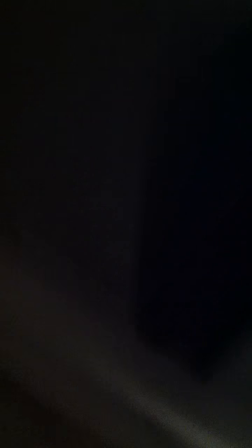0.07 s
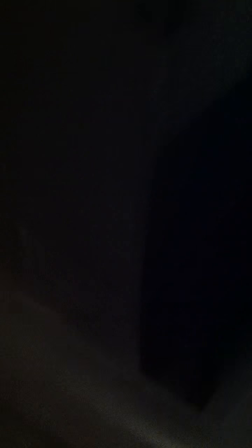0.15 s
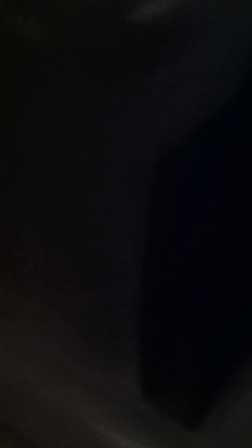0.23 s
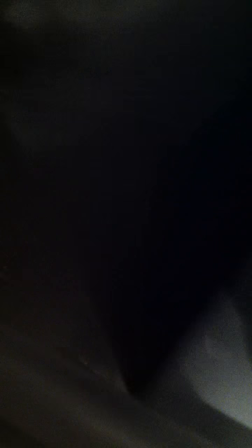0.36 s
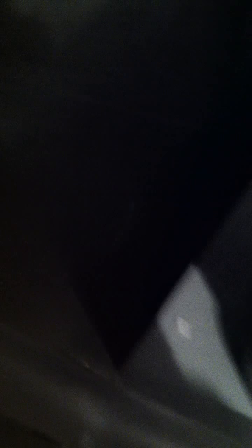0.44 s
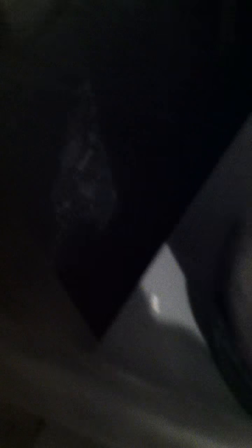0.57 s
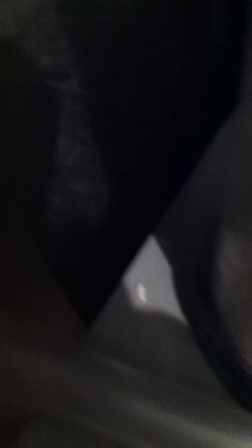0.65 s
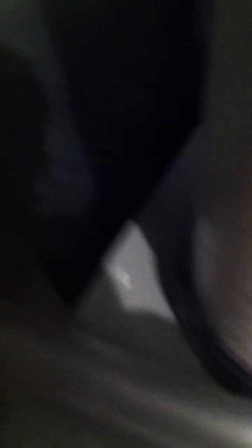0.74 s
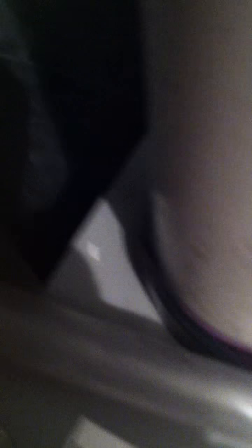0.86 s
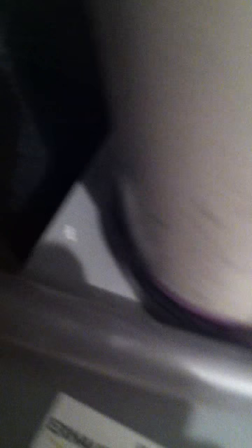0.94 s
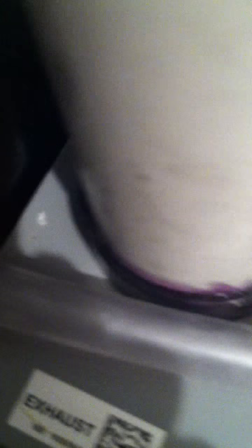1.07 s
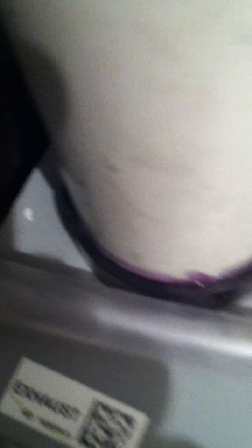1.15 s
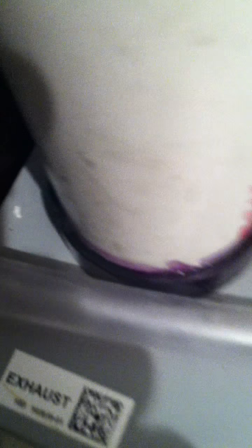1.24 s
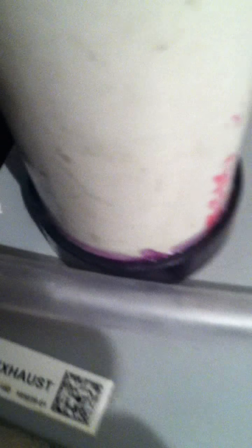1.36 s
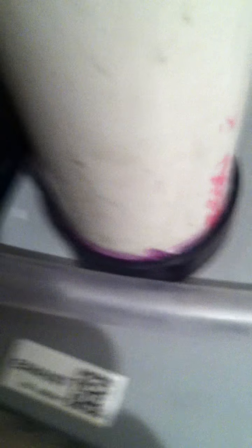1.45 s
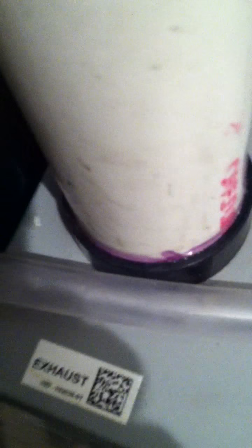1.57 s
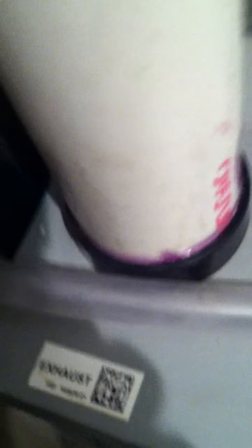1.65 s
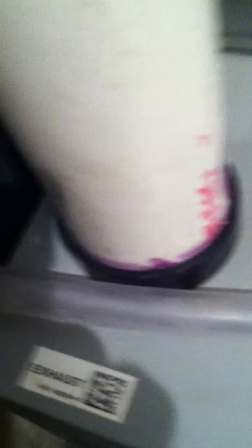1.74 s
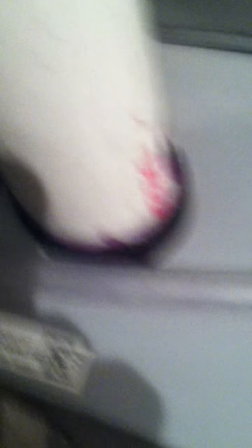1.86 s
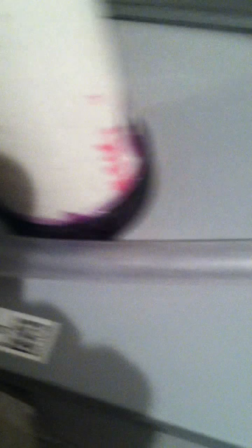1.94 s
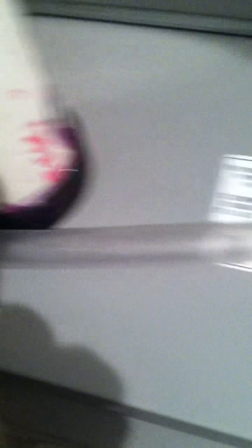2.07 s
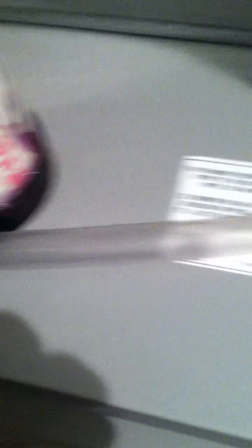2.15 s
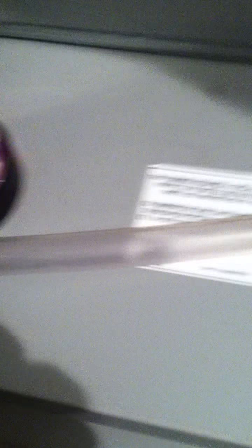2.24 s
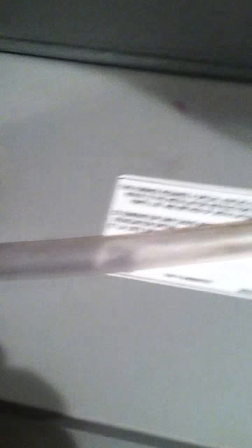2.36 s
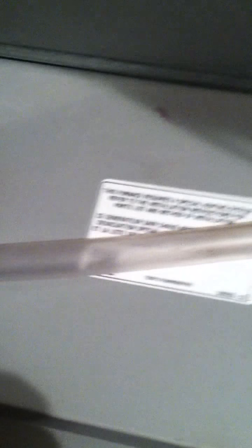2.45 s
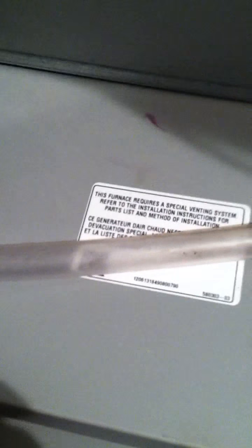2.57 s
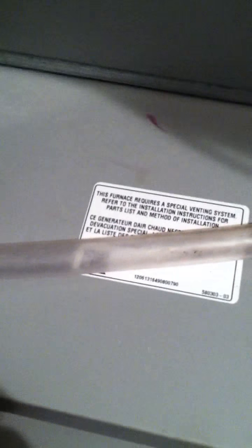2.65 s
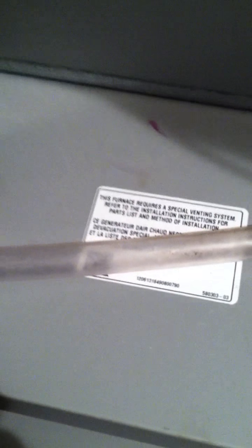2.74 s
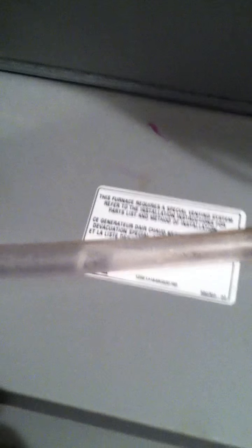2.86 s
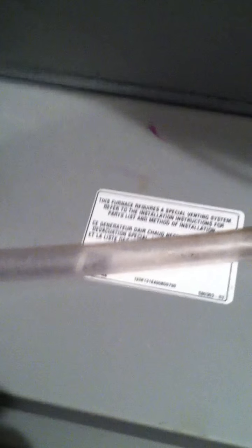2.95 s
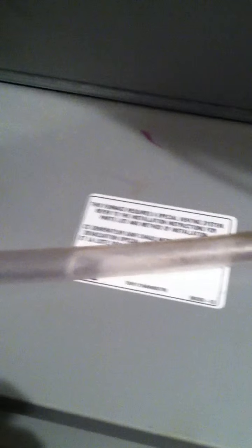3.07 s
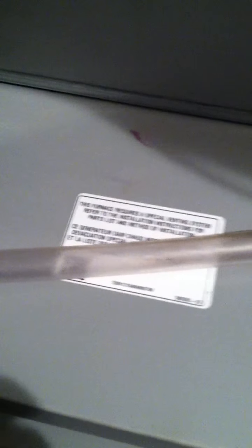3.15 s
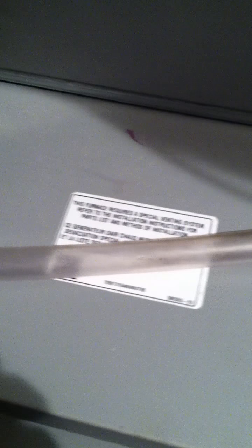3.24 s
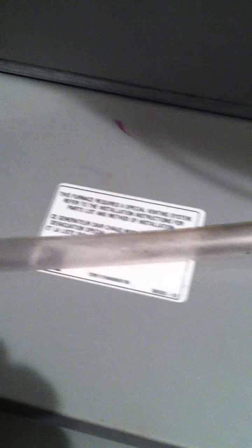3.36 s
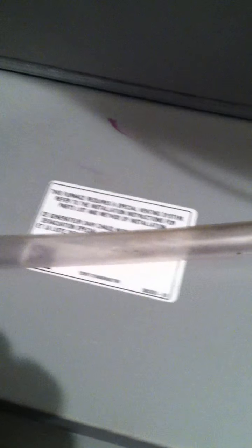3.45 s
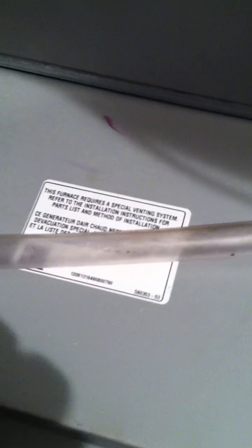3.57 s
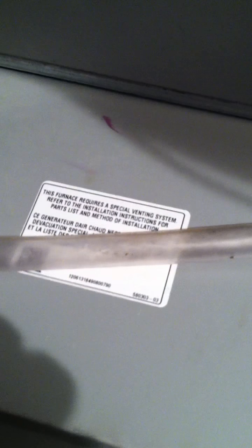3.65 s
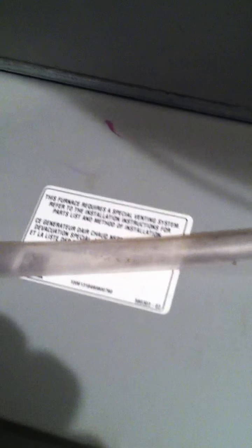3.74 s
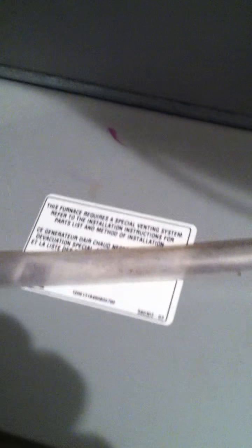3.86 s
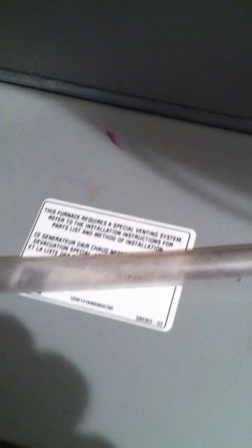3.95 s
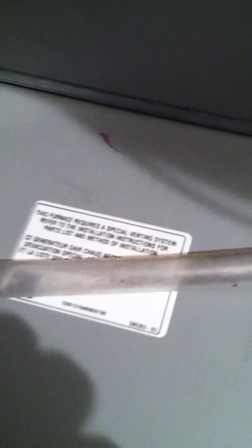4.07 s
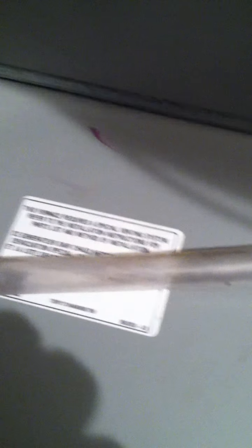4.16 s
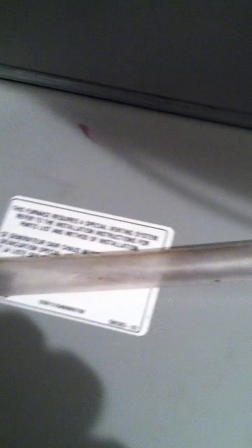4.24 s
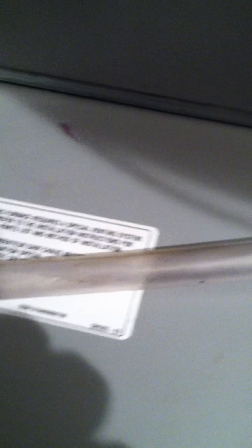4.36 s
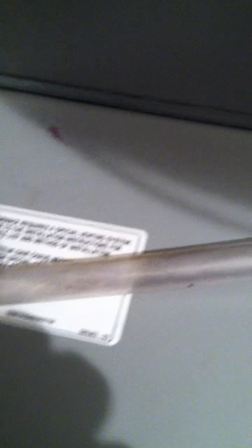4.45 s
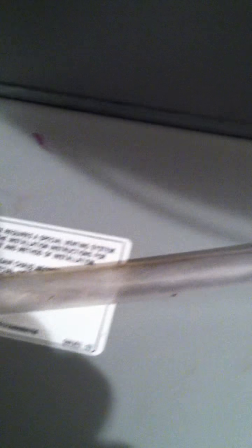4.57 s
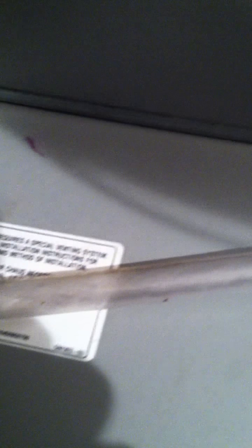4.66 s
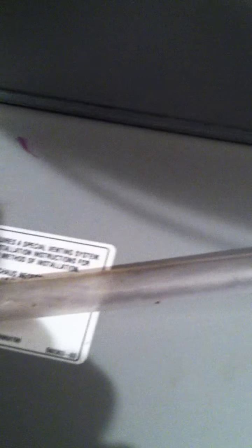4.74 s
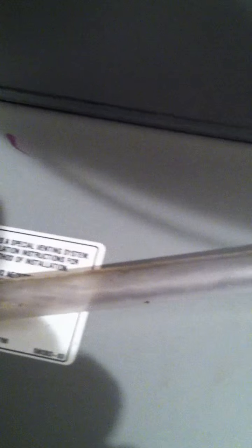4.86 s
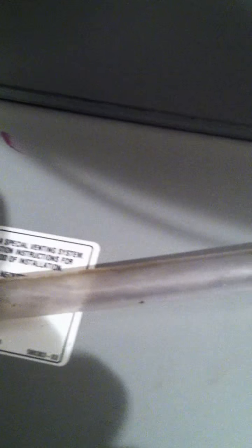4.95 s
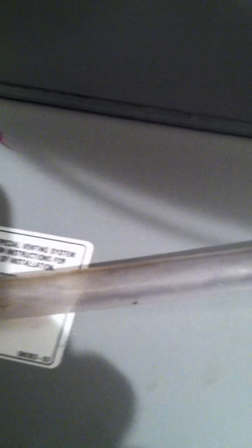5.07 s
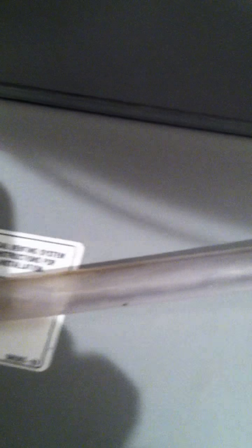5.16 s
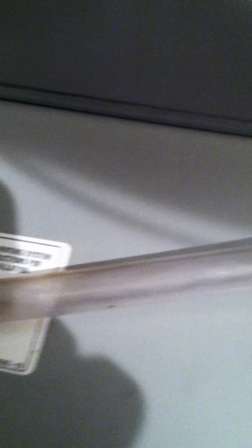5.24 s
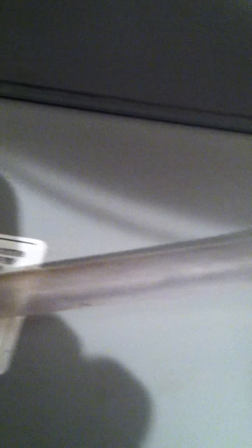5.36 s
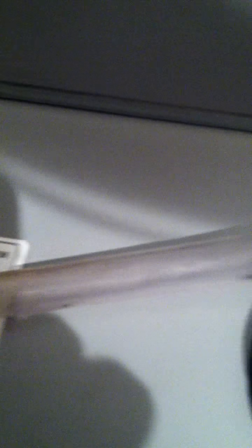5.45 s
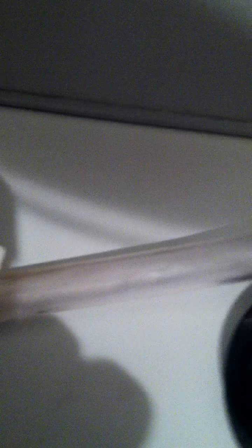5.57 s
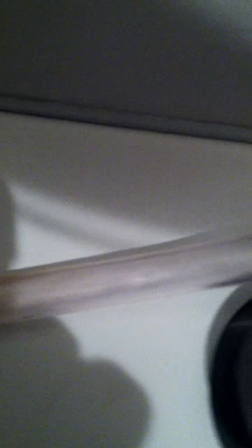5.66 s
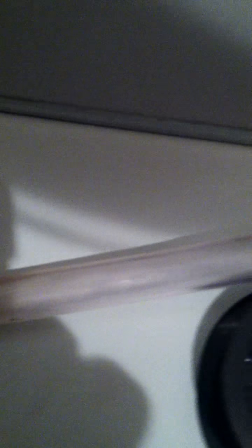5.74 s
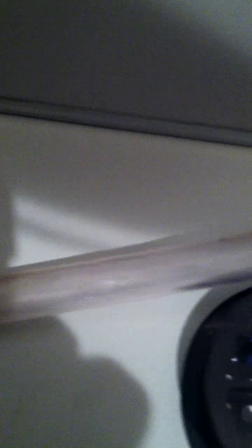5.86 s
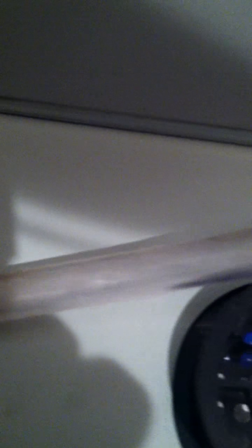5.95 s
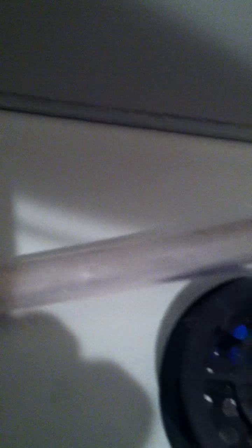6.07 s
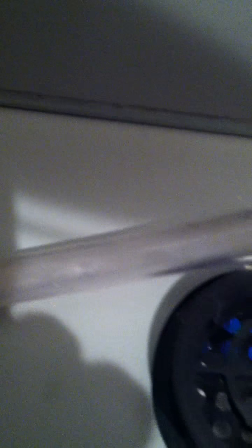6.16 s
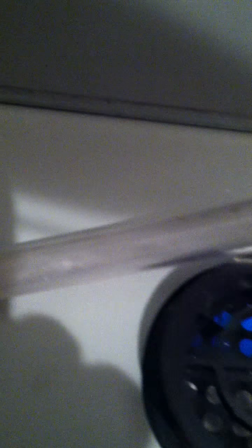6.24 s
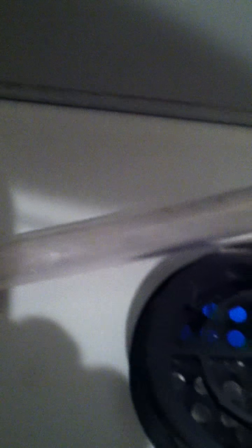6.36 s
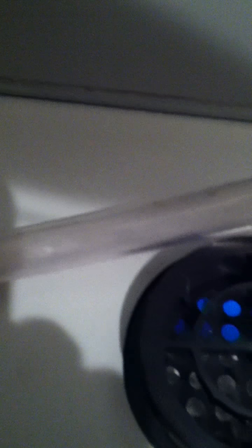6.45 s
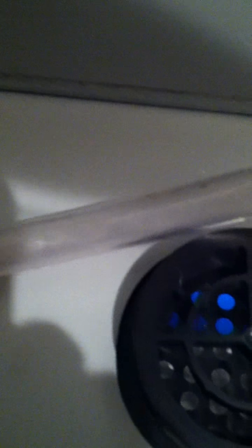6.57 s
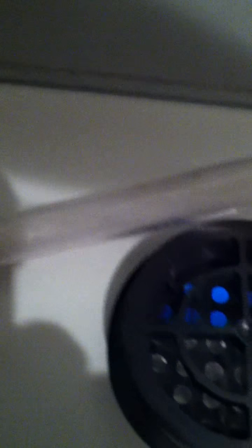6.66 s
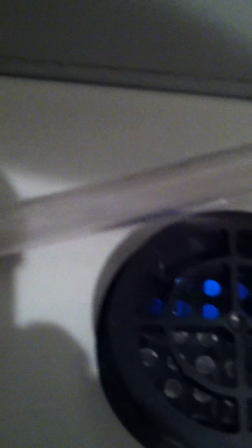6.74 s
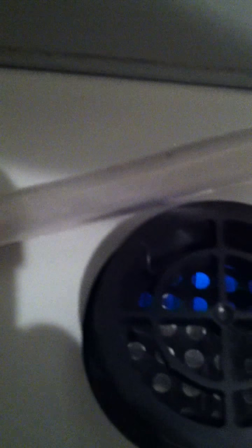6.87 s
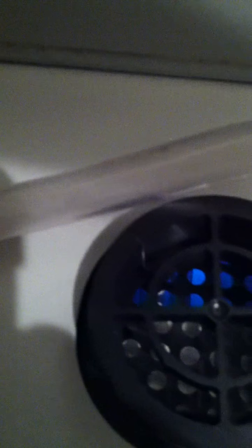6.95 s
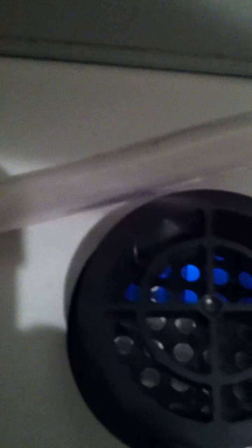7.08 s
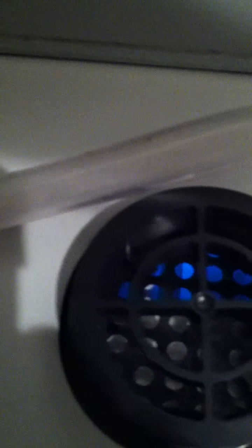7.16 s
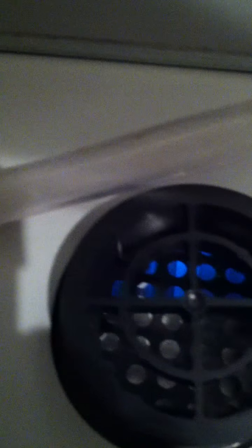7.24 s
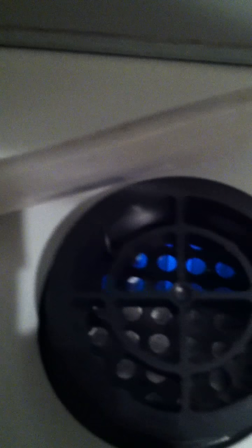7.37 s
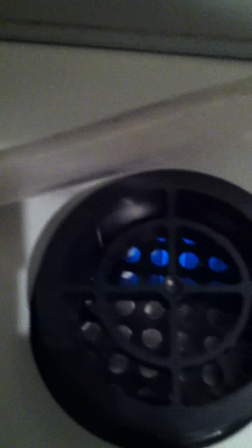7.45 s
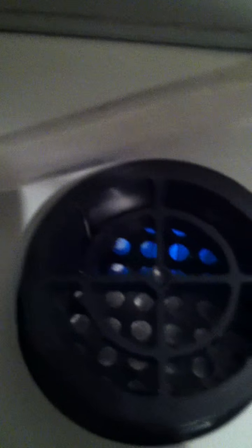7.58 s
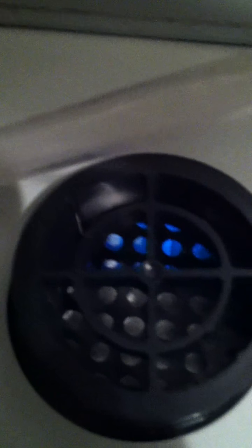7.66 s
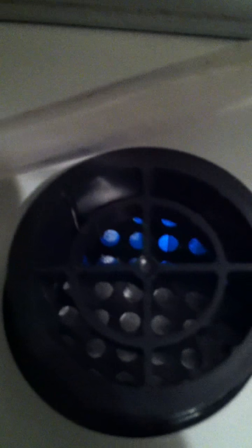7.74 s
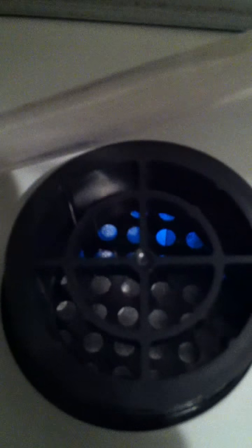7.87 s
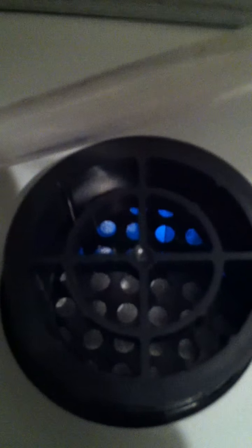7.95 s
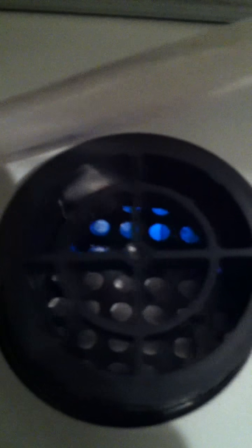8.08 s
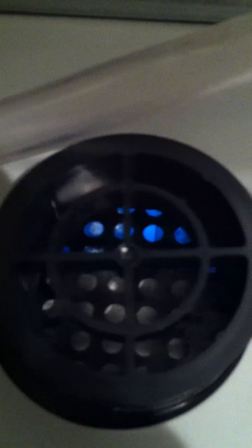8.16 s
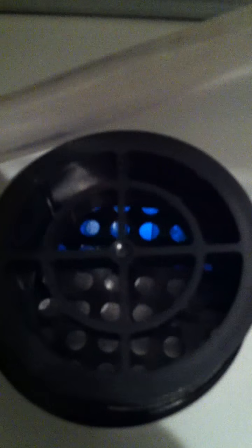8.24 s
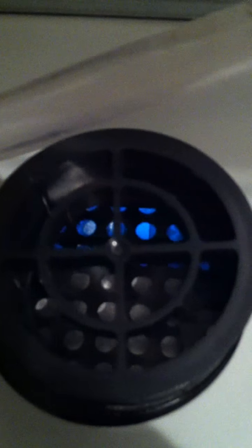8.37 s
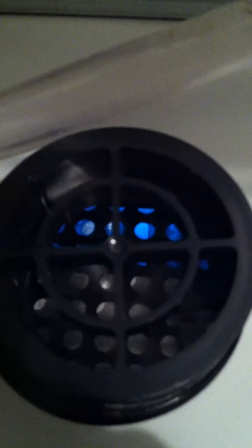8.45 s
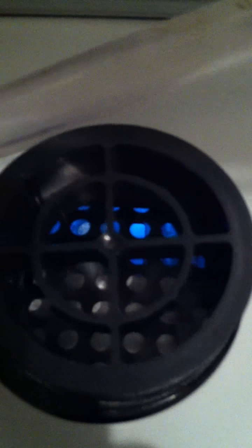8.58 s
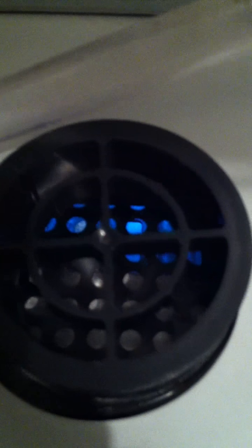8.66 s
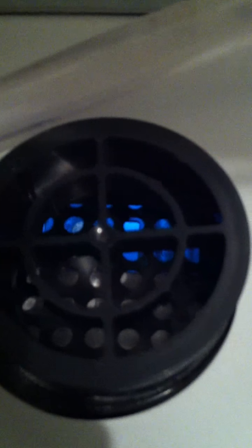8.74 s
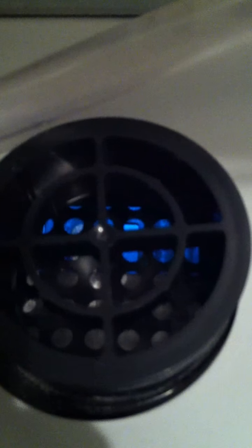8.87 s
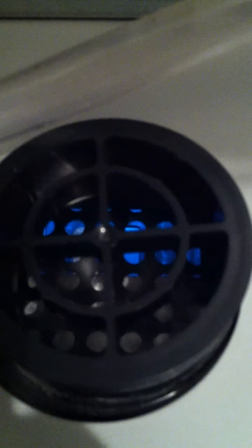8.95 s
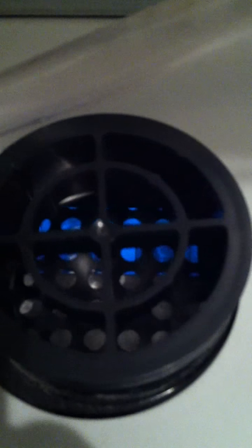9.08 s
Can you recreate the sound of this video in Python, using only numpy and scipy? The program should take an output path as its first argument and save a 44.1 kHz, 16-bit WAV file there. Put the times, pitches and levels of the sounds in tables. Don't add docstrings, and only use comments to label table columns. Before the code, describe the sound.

A gas furnace runs steadily in a basement, heard close up on a handheld phone. A locked low fan hum with its octave sits over a soft flame rumble and rushing air. Fingers tick on the phone case, with one loud dry snap near one and a half seconds and a knocking scrape at two. Then the phone moves nearer the intake and the upper hum and airy hiss swell until the end.

```python
import sys
import numpy as np
from scipy import signal
from scipy.fft import rfft, irfft, next_fast_len
from scipy.io import wavfile
from scipy.ndimage import uniform_filter1d, map_coordinates

SR = 44100
rng = np.random.default_rng(int(sys.argv[2]) if len(sys.argv) > 2 else 0)


def file_out(sig):
    cols = np.atleast_2d(sig).T
    lim = np.clip(cols, -1, 1)
    pcm = np.round(lim * 32767).astype(np.int16)
    wavfile.write(sys.argv[1], SR, pcm)


def volts_from_db(level):
    exponent = np.asarray(level, float) / 20
    return 10 ** exponent


N = 401751

# (time [s], nearness [0-1])
NEARNESS = [
    (0, 0.05),
    (1.9, 0.21),
    (2.3, 0.49),
    (4.6, 0.57),
    (5.8, 0.83),
    (7.2, 0.95),
    (9.11, 0.96),
]
# (time [s], level [dB])
EXPOSURE = [(0, 0), (.7, 0.5), (1.6, -.5), (2.0, 0), (3.1, -1), (3.7, 0), (4.4, 0), (5.0, 0.5), (6.3, 0.5),
            (6.8, 0), (7.7, 0), (8.2, -1), (8.6, -0.5), (9.11, -2)]

# (time [s], level [dB rms])
SECOND_TONE = [(0, -14), (.7, -14), (1.3, -16), (1.9, -16), (2.5, -14.5), (3.3, -16), (3.7, -14),
               (4.1, -14.5), (4.6, -10.5), (5.1, -10.5), (5.7, -8), (6.3, -7.5), (7.4, -7), (8.1, -7.5),
               (8.6, -7), (9.11, -8.5)]
# (multiple of the blade rate, level [dB])
OVERTONES = [(3, -50), (4, -43.5)]
# (multiple of the blade rate, offset [Hz], level [dB])
SIDE_TONES = [(1, -27.6, -37), (1, 27.6, -40), (2, 27.6, -39.5), (4, 27.6, -52)]
# (frequency [Hz], level [dB rms])
MOTOR_WHINE = [(4963, -64), (5722, -63), (4725, -67), (5264, -66), (5395, -65)]

# (frequency [Hz], density [dB per Hz])
RUMBLE_COLOUR = [(20, -46.5), (48, -39), (70, -31.5), (85, -12), (115, -6.5), (148, -1.5), (170, -1.5),
                 (200, -9), (260, -42.5)]
# (frequency [Hz], density [dB per Hz])
BOOM_COLOURS = [
    [(150, -40), (200, 0), (235, 5.5), (262, -3), (300, 5), (330, 4), (372, 0), (395, -5), (430, -6),
     (520, -39)],
    [(150, -41), (200, -8.5), (235, -6), (262, -8), (300, -3), (352, 6.5), (372, 2.5), (390, -17),
     (430, -19.5), (520, -45.5)],
]
# (frequency [Hz], density [dB per Hz])
RUSH_COLOURS = [
    [(240, -33), (400, -8), (439, -6.5), (476, 1.5), (587, -2.5), (702, -1), (723, 0), (966, -6.5),
     (1170, -4), (1600, -16), (2080, -42.5), (3520, -120)],
    [(240, -32.5), (400, -1), (421, 0), (449, -10), (476, -3.5), (593, -8), (698, -6), (891, -11.5),
     (1200, -12.5), (1600, -22.5), (2080, -53.5), (3520, -120)],
    [(240, -32.5), (400, -0.5), (510, -3.5), (554, -3.5), (611, -4), (694, -5.5), (966, -12), (1140, -13),
     (1370, -17), (1600, -24.5), (2080, -46.5), (3520, -120)],
]
# (frequency [Hz], density [dB per Hz])
DUCT_COLOURS = [
    [(880, -22), (1500, -1.5), (1770, -4.5), (1920, -6.5), (2350, -7.5), (2800, -12.5), (3640, -47.5),
     (6160, -120)],
    [(880, -34.5), (1500, -9), (1640, -7), (1780, -1), (1980, -3), (2130, 1), (2800, -14), (3640, -43),
     (6160, -120)],
    [(880, -33.5), (1500, -6.5), (1610, -1.5), (1810, 1), (2000, -2), (2200, -7.5), (2440, -2.5),
     (2800, -20), (3640, -39), (6160, -120)],
]
# (frequency [Hz], density [dB per Hz])
HISS_COLOURS = [
    [(1530, -24.5), (2600, -12), (2890, -4), (3240, -2), (3470, -0.5), (3770, -2), (5090, 2.5), (5350, 2),
     (5950, -3.5), (6500, -35.5), (8450, -49.5), (14300, -120)],
    [(1530, -31), (2600, -1.5), (2870, -3), (3770, -1), (4410, -2), (4670, -1), (5350, -0.5), (6500, -14),
     (8450, -42.5), (14300, -120)],
    [(1530, -30), (2600, -3.5), (2890, 1.5), (3150, 1), (4350, 0), (4690, 0.5), (5090, 2.5), (5700, -3),
     (6500, -15.5), (8450, -40.5), (14300, -120)],
]
# (frequency [Hz], density [dB per Hz])
FIZZ_COLOUR = [(3650, -26), (6200, 0), (9660, -12.5), (11400, -15), (12500, -20.5), (13900, -33.5),
               (15100, -32), (15400, -38)]

# (level [dB], level [dB], level [dB])
FIRST_TONE_DB = (-17.5, -24, -23.5)
RUMBLE_DB, BOOM_DB = (-31, -28.5, -25.5), (-27.5, -27, -21)
RUSH_DB, DUCT_DB = (-29.5, -29.5, -27.5), (-42.5, -40.5, -38.5)
HISS_DB, FIZZ_DB = (-45, -42.5, -40.5), (-55, -54.5, -52.5)

# (time [s], peak [dB], centre [Hz], dull knock beside it, relative to the tick [dB])
TICKS = [(0.119, -30, 8130, -8), (0.1267, -29, 8070, -4.5), (0.3708, -26.5, 8970, -7.5),
         (1.1567, -19.5, 4220, -12), (1.1569, -26.5, 8500, -9), (1.418, -32, 7000, -6),
         (1.9463, -26, 8600, 8), (1.947, -27.5, 4300, 0), (2.0200, -27, 8000, 5), (2.028, -28, 5500, 1),
         (2.0364, -26, 6000, -3), (2.0405, -20.5, 6000, 2), (2.0410, -8.5, 4560, -5.5),
         (2.0417, -15.5, 7200, -3), (2.0666, -30, 9000, -10), (2.07, -30, 3000, -3)]
# (time [s], peak [dB], centre [Hz])
KNOCKS = [(1.3682, -11, 950), (1.4471, -13.5, 900), (2.0415, -11, 1900), (2.0405, -12, 330),
          (2.066, -15, 300), (2.0412, -4, 1200), (2.0410, -9, 700), (2.0613, -12, 1250),
          (2.0695, -12, 1350), (2.0708, -8, 600), (2.0878, -12, 800), (2.032, -14, 300), (2.0375, -15, 800)]
# (start [s], rise [s], hold [s], fall [s], level [dB])
SCRAPES = [
    (2.005, .03, 0.011, .004, -37.5),
    (2.044, .003, .025, .008, -43.5),
]
# (start [s], rise [s], hold [s], fall [s], level [dB])
SCUFFS = [
    (1.35, .025, 0.24, .06, -35.5),
    (2.0, 0.048, 0.036, .05, -28.5),
]
# (frequency [Hz], density [dB per Hz])
SCRAPE_COLOUR = [(1500, -46.5), (2500, -8), (4500, 0), (7000, -4), (10000, -9), (14000, -23.5),
                 (15500, -52.5)]
# (frequency [Hz], density [dB per Hz])
SCUFF_COLOUR = [(200, -32), (400, 1), (800, -3.5), (1400, -4), (2300, -13.5), (3500, -38)]
# (time [s], depth [dB])
DUCKS = [
    (1.45, 1.5),
    (2.05, 3.5),
]


def unit(x):
    return x / np.sqrt(np.mean(x ** 2) + 1e-20)


def curve(rows):
    s, value = np.transpose(rows)
    return np.interp(np.arange(N) / SR, s, value)


def wobble(rate):
    coarse = np.arange(0, N + 32, 32)
    smooth = map_coordinates(rng.standard_normal(N // 100), [coarse * rate / SR])
    return np.interp(np.arange(N), coarse, smooth)


def placed(levels_db):
    return np.interp(curve(NEARNESS), [0, .5, 1], levels_db) + curve(EXPOSURE)


def coloured_noise(colour, patchy_db):
    z = signal.stft(rng.standard_normal(N + 1024), nperseg=512)[2]
    patches = rng.random(z.shape, dtype=np.float32) - .5
    patches = uniform_filter1d(patches, size=5, axis=0)
    patches = uniform_filter1d(patches, size=12, axis=1)
    x = signal.istft(z * volts_from_db(patchy_db * unit(patches)), nperseg=512)[1][:N]
    hz, db = np.transpose(colour)
    m = next_fast_len(N)
    bins_hz = np.fft.rfftfreq(m, 1 / SR)
    gain = volts_from_db(np.interp(np.log(bins_hz + 1), np.log(hz + 1), db, -120, -120))
    return unit(irfft(rfft(x, m) * gain, m)[:N])


def blend(colours, patchy_db):
    place = curve(NEARNESS) * (len(colours) - 1)
    mix = np.zeros(N)
    for k, colour in enumerate(colours):
        share = np.clip(1 - abs(place - k), 0, 1)
        mix += np.sqrt(share) * coloured_noise(colour, patchy_db)
    return mix


def fan():
    blade_hz, drift_hz = 172.05, .12
    t = np.arange(N) / SR
    closer_db = 7 * (curve(NEARNESS) - .6)
    first_db, second_db = placed(FIRST_TONE_DB), curve(SECOND_TONE)
    turn = 2 * np.pi * np.cumsum(blade_hz + drift_hz * wobble(2.5)) / SR + .04 * wobble(9)

    tones = volts_from_db(first_db + 1.2 * wobble(5)) * np.cos(turn + .05 * wobble(12))
    second_gain = volts_from_db(second_db + .65 * wobble(9) + .3 * wobble(35))
    tones += second_gain * np.cos(2 * turn - 2.8 + .055 * wobble(45))
    for k, db in OVERTONES:
        tones += volts_from_db(db + closer_db + wobble(3)) * np.cos(k * turn)
    for k, hz, db in SIDE_TONES:
        phase = k * turn + 2 * np.pi * hz * t
        tones += volts_from_db(db + closer_db + 4 * wobble(3)) * np.cos(phase + 1.1 * wobble(5))
    for hz, db in MOTOR_WHINE:
        gain = volts_from_db(db + .6 * closer_db + 2.2 * wobble(3))
        tones += gain * np.cos(2 * np.pi * hz * t + 1.5 * wobble(8))
    return np.sqrt(2) * tones


def flame():
    flicker = wobble(4.6)
    rumble_gain = volts_from_db(placed(RUMBLE_DB) + 0.87 * flicker + 0.51 * wobble(2.2))
    rumble = rumble_gain * coloured_noise(RUMBLE_COLOUR, patchy_db=1.8)
    boom = volts_from_db(placed(BOOM_DB) + 0.43 * flicker) * blend(BOOM_COLOURS, patchy_db=0.5)
    return rumble + boom


def air():
    eddies_db = 0.42 * wobble(3.3) + 0.32 * wobble(20.5)
    cabinet = volts_from_db(placed(RUSH_DB)) * blend(RUSH_COLOURS, patchy_db=0.63)
    duct = volts_from_db(placed(DUCT_DB)) * blend(DUCT_COLOURS, patchy_db=0.36)
    hiss = volts_from_db(placed(HISS_DB)) * blend(HISS_COLOURS, patchy_db=0.85)
    fizz = volts_from_db(placed(FIZZ_DB)) * coloured_noise(FIZZ_COLOUR, patchy_db=1.8)
    return volts_from_db(eddies_db) * (cabinet + duct + hiss + fizz)


def add_tap(y, s, db, hz, cycles):
    t = np.arange(SR // 40) / SR
    u = t * hz / cycles
    y[round(s * SR):][:len(t)] += volts_from_db(db) * np.e * u * np.exp(-u) * np.sin(2 * np.pi * hz * t)


def slides(rows):
    t = np.arange(N) / SR
    gain = np.zeros(N)
    for s, rise, hold, fall, db in rows:
        corners = np.cumsum([s, rise, hold, fall])
        gain += volts_from_db(np.interp(t, corners, db - np.array([29, -2, 0.5, 38]), -120, -120))
    return gain


def fingers():
    taps = np.zeros(N)
    for s, db, hz, knock_db in TICKS:
        add_tap(taps, s, db, hz, cycles=0.78)
        add_tap(taps, s, db + knock_db, 2100, cycles=0.22)
    for s, db, hz in KNOCKS:
        add_tap(taps, s, db - 2.5, hz, cycles=.75)
    snap_s, snap_db = 1.4467, 2
    add_tap(taps, snap_s, snap_db, 6400, cycles=.33)
    add_tap(taps, snap_s, snap_db - 9, 2400, cycles=.3)
    shell = signal.butter(3, [140, 9500], "band", fs=SR, output="sos")
    scrape = slides(SCRAPES) * volts_from_db(4.7 * wobble(420)) * coloured_noise(SCRAPE_COLOUR, patchy_db=.5)
    scuff = slides(SCUFFS) * volts_from_db(2.5 * wobble(86)) * coloured_noise(SCUFF_COLOUR, patchy_db=4.0)
    return signal.sosfilt(shell, taps) + scrape + scuff


def scene():
    return (fan() + flame() + air() + fingers())[None]


def top_cut(x):
    return signal.sosfilt(signal.butter(12, 15500, fs=SR, output="sos"), x)


def record(dry):
    attack_s, release_s = 0.032, 0.5
    t = np.arange(N) / SR
    duck_db = np.zeros(N)
    for s, db in DUCKS:
        since = np.clip(t - s, 0, None)
        duck_db += db * (1 - np.exp(-since / attack_s)) * np.exp(-since / release_s)
    closing = np.sin(np.pi / 2 * np.clip((t[-1] - t) / .0012 + .3, 0, 1))
    level = dry * volts_from_db(-duck_db) * closing
    soft = level / (1 + np.abs(level / .98) ** 8) ** (1 / 8)
    return top_cut(soft)


dry = scene()
out = record(dry)
file_out(out)
```